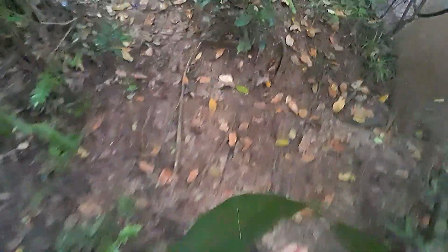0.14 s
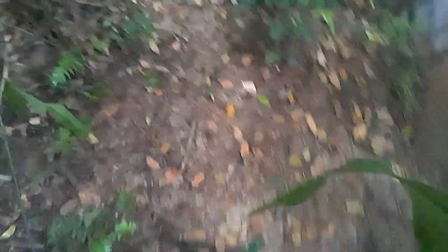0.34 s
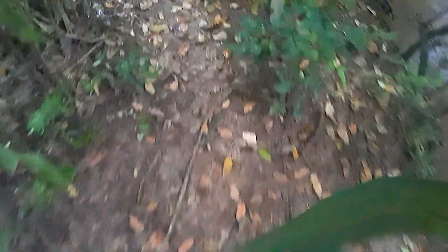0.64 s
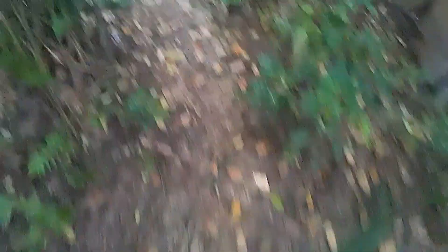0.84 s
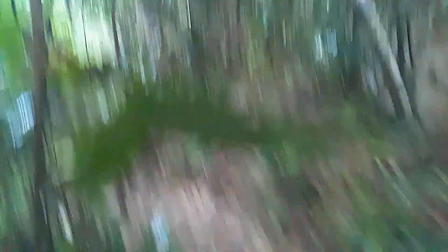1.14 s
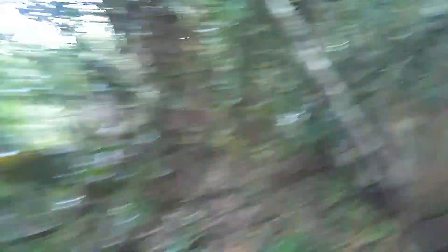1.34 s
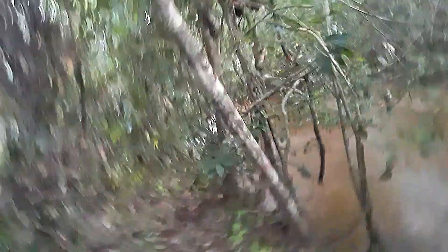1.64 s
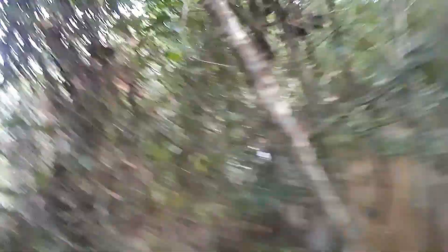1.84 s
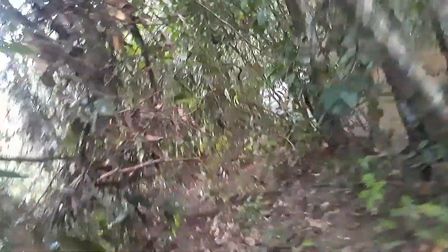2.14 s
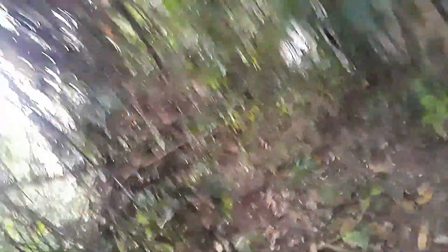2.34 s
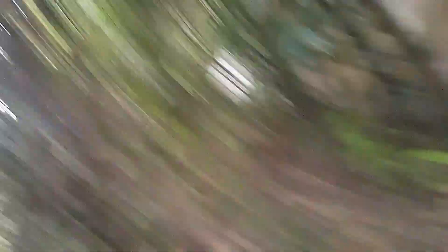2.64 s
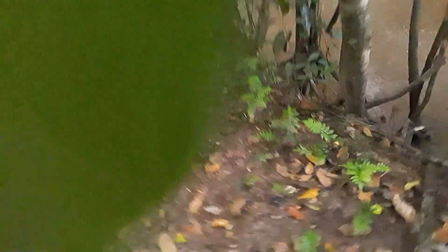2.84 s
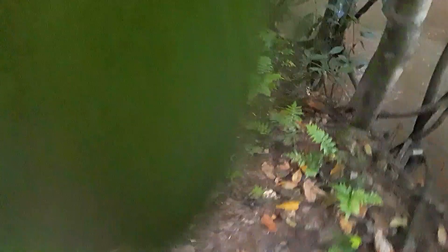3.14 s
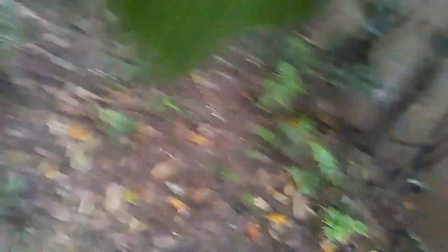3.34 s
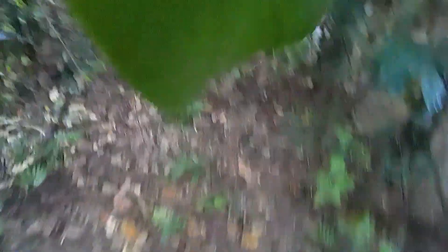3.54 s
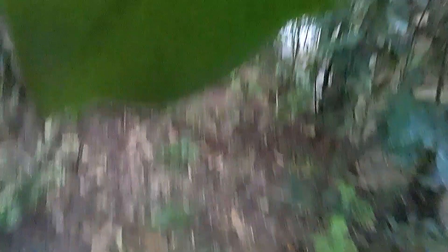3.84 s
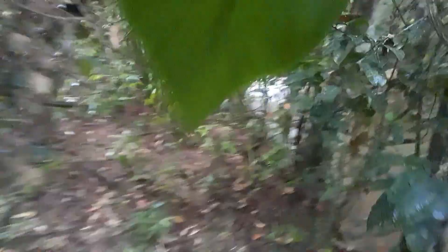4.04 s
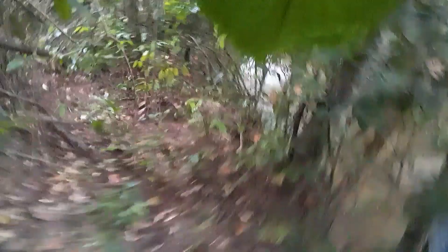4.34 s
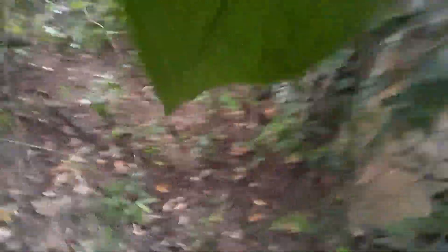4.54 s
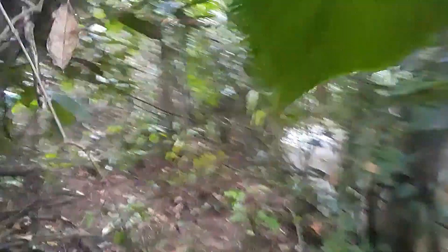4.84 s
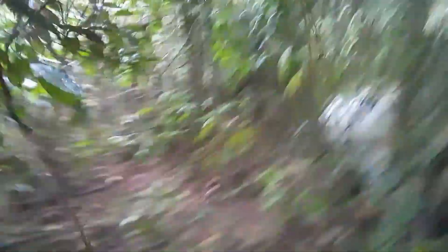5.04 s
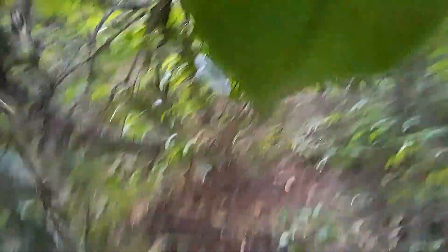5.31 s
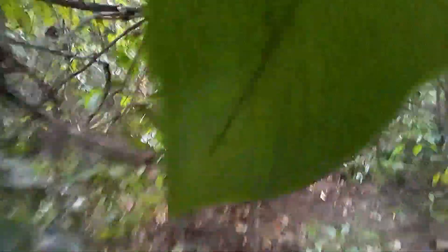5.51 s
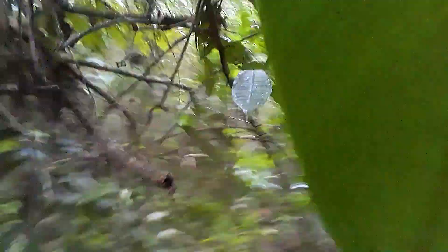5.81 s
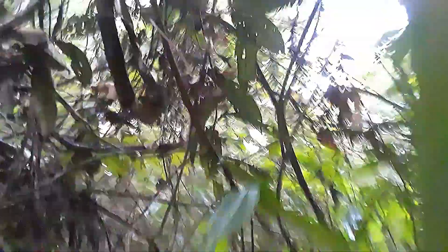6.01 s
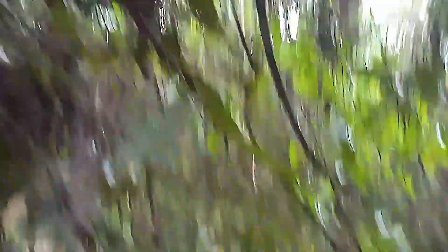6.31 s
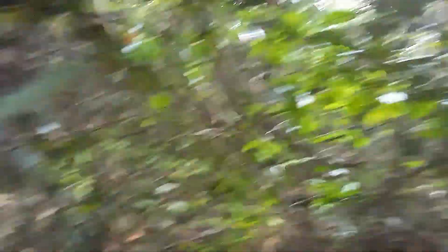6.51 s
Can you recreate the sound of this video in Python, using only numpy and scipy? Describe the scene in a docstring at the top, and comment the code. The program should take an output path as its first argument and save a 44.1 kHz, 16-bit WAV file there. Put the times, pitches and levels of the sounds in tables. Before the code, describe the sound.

Steady rain in a forest, with sharp drips and dull thumps on a big leaf held over the microphone, plus rubbing and rustling.

```python
"""Steady rain on a forest path, walking with a big leaf held close over a mono microphone.
At first, far drops wash through the canopy and patter on the litter, with the odd drip close by.
From 2 s the leaf rubs on the microphone, fat drips and bumps set it ringing, small drips tick
and wet foliage brushes past. The heaviest knock comes at 3.6 s, as the carried leaf rumbles.
Scattered knocks, rubs and rustles follow; the rumble and the rain ease towards the end."""
import sys
import numpy as np
from scipy import signal
from scipy.fft import rfft, irfft
from scipy.io import wavfile

SR = 44100
rng = np.random.default_rng(int(sys.argv[2]) if len(sys.argv) > 2 else 0)


def log_audio(samples):
    """Write samples as a 16-bit WAV file to the path given in sys.argv[1]."""
    # one column per channel
    frames = np.atleast_2d(samples).T
    # limit to full scale, then quantise
    limited = np.clip(frames, -1, 1)
    pcm = np.round(limited * 32767).astype(np.int16)
    wavfile.write(sys.argv[1], SR, pcm)


N = 294147
TIME, HZ = np.arange(N) / SR, np.arange(N // 2 + 1) * SR / N

# rain all around as the microphone turns: t/s, relative canopy level/dB, relative patter level/dB
RAIN_LEVELS = [(0.0, -35.5, -31.5), (0.15, -39, -32), (2.69, -37, -31.5), (3.16, -37, -33),
               (3.75, -34.5, -32), (3.99, -35.5, -32), (4.33, -38, -34), (4.9, -40, -34.5),
               (5.39, -37.5, -33.5), (6.67, -41, -33)]
# spectrum of the rain from the path: f/Hz, level/dB
RAIN_SPECTRUM = [(40, -38), (90, -31), (180, -7.5), (350, -2), (700, 0.5), (1200, 0), (2200, -1), (3900, 1),
                 (5200, -1), (7000, -3), (8100, -0.5), (10500, -3), (12500, 2), (15500, -0.5)]
# wet foliage passing the microphone: middle t/s, half length/s, level/dB
RUSTLE_SWELLS = [(2.62, 0.21, -37), (2.95, 0.13, -37), (3.17, .04, -36), (3.883, .11, -33.5),
                 (4.027, .035, -31), (4.174, 0.048, -28.5), (4.67, .03, -31), (5.882, 0.05, -33.5)]
# spectrum of that foliage: f/Hz, level/dB
RUSTLE_SPECTRUM = [(500, -25), (2500, -21.5), (6500, -14), (14000, -9)]
# rumble of the carried leaf: t/s, relative level/dB
SHAKE_LEVELS = [(0.0, -60), (0.35, -71), (0.91, -74), (1.49, -55), (2.04, -56), (2.21, -51), (2.36, -70),
                (2.56, -52.5), (2.9, -65), (3.05, -44.5), (3.81, -40.5), (4.68, -50.5), (5.41, -41),
                (5.66, -49.5), (6.33, -55), (6.5, -54), (6.67, -58)]
# spectrum of that rumble: f/Hz, level/dB
SHAKE_SPECTRUM = [(25, -29), (45, -14), (75, -8.5), (130, -1.5), (200, -9), (320, -15), (600, -15),
                  (1500, -67), (4000, -70)]
# the big leaf right on the microphone: start t/s, length/s, level/dB, contact cut-off f/Hz
LEAF_RUBS = [(2.008, 0.365, -39, 128), (2.929, 0.023, -26, 680), (3.111, 0.027, -29.5, 790),
             (3.435, 0.018, -34, 500), (3.568, 0.048, -23, 355), (3.847, 0.17, -40.5, 454),
             (5.388, 0.12, -35, 490), (6.31, 0.027, -36.5, 446)]
# sharp ticks close by, mostly small drips, some further cracks of knocks on the big leaf: t/s, relative
# level/dB, f/Hz, spray t60/s
CLOSE_TICKS = [ (1.063, -17, 12000, .008), (2.353, -7.5, 8500, 0.011), (2.417, -13.5, 8050, 0.011),
               (2.6572, -13.5, 3500, .008), (3.161, -11, 10100, 0.019), (3.191, -14, 6460, 0.0088),
               (3.4302, -13.5, 4060, 0.012), (3.451, -15.5, 4450, 0.011), (3.7949, -6.5, 2860, 0.018),
               (4.004, -12, 9050, .035), (4.045, -11.5, 12000, .0045), (4.107, -16, 3030, 0.032),
               (4.108, -16, 7000, .02), (4.1767, -15, 7540, 0.011), (4.179, -13, 5500, 0.025),
               (4.539, -12, 3870, .0063), (5.616, -17.5, 3000, .0053), (6.133, -13, 6000, 0.0051),
               (6.417, -13, 6000, .0044)]
# modes of the big leaf: f/Hz, level/dB
BIG_LEAF_MODES = [(82, -8), (122, -4), (148, -3), (205, 0), (305, -0.5), (365, -0.5), (445, 0.5), (560, -2),
                  (680, -2.5), (880, 4), (1120, 7), (1430, 13), (1850, 11), (2500, -14)]
# fat drips and bumps on it: t/s, level/dB over the first 20 ms, struck spot f/Hz, contact cut-off f/Hz
LEAF_KNOCKS = [ (0.044, -37, 910, 1110), (1.025, -40, 500, 605), (2.07, -34, 170, 256),
               (2.188, -33, 125, 190), (2.236, -27, 127, 247), (2.329, -34, 155, 220),
               (2.447, -37.5, 910, 920), (2.656, -30, 950, 2160), (2.846, -23.5, 358, 1000),
               (2.919, -23.5, 680, 940), (3.115, -27.5, 244, 1090), (3.210, -29.5, 191, 604),
               (3.299, -33, 185, 453), (3.432, -27.5, 383, 1380), (3.516, -26.5, 420, 1290),
               (3.5619, -14.5, 144, 740), (3.603, -17.5, 288, 417), (3.684, -27, 497, 1400),
               (3.707, -25, 168, 244), (3.795, -30.5, 700, 1520), (4.038, -30.5, 312, 700),
               (4.289, -34, 477, 553), (4.993, -24, 690, 1340), (5.161, -30.5, 610, 1090),
               (5.261, -29.5, 227, 613), (5.373, -23, 197, 920), (5.476, -29.5, 1130, 1460),
               (5.616, -34, 220, 875), (5.859, -41, 250, 400), (5.957, -40, 180, 345),
               (6.190, -26, 190, 790), (6.310, -29, 343, 700), (6.505, -38, 454, 640)]
# treble shelf of the microphone: f/Hz, level/dB
MIC_SHELF = [(8200, 1.5), (9000, -9.5)]


def from_db(db):
    """Decibels to gain."""
    return 10 ** (np.asarray(db) / 20)


def rms_one(x):
    """Scale to an rms of 1."""
    return x / np.sqrt(np.mean(x ** 2) + 1e-20)


def in_time(rows):
    """Each column of a curve at every sample."""
    s, *columns = np.transpose(rows)
    return [np.interp(TIME, s, c) for c in columns]


def coloured(x, spectrum):
    """Shape a sound by points of f/Hz, level/dB."""
    hz, db = np.transpose(spectrum)
    gain = from_db(np.interp(np.log(HZ + 1), np.log(hz), db))
    return irfft(rfft(x) * gain, N)


def cut(x, hz, kind, order=2):
    """Causal low- or high-pass."""
    return signal.sosfilt(signal.butter(order, np.clip(hz, 10, .45 * SR), kind, fs=SR, output="sos"), x)


def drift(rate_hz):
    """Slow random wander with an rms of 1."""
    return rms_one(irfft(rfft(rng.standard_normal(N)) / (1 + (HZ / rate_hz) ** 2), N))


def resonate(x, hz, width_hz):
    """One resonance with a peak gain of 1."""
    r = np.exp(-np.pi * width_hz / SR)
    w = 2 * np.pi * min(hz, .45 * SR) / SR
    return signal.lfilter(np.array([1, 0, -1]) * (1 - r * r) / 2, [1, -2 * r * np.cos(w), r * r], x + 1e-18)


def add(out, s, sound):
    """Mix a short sound in at a time."""
    at = max(round(s * SR), 0)
    out[at:at + len(sound)] += sound[:max(N - at, 0)]


def droplets(per_s, spread_db, low_hz, high_hz, width, leaves=20):
    """Random impacts of uneven size, each ringing one of many heavily damped leaves; rms 1."""
    sizes = from_db(spread_db * np.minimum(rng.exponential(1, N), 4.5)) * rng.choice([-1, 1], N)
    clicks = sizes * (rng.random(N) < per_s / SR)
    leaf = rng.integers(0, leaves, N)
    pitches = np.geomspace(low_hz, high_hz, leaves)
    return rms_one(sum(resonate(clicks * (leaf == k), hz, width * hz) for k, hz in enumerate(pitches)))


def rain(waver_db=0.5, waver_hz=12):
    """Far drops in the canopy merge into a wash; nearer ones stay separate as patter and plops."""
    canopy_db, patter_db = in_time(RAIN_LEVELS)
    wash = rng.standard_normal(N) * from_db(.5 * drift(8))
    patter = droplets(per_s=4500, spread_db=3, low_hz=1200, high_hz=13000, width=.5)
    plops = droplets(per_s=450, spread_db=4, low_hz=287, high_hz=2170, width=.17)
    drops = rms_one(coloured(wash + from_db(-6.5) * patter + from_db(-17) * plops, RAIN_SPECTRUM))
    body = coloured(drops, [(1500, -5), (3500, -25), (8000, -45)])
    bright = drops - body
    return body * from_db(canopy_db + 9.5) + bright * from_db(patter_db + 3 + waver_db * drift(waver_hz))


def near_drops(patter_db=-51, spit_db=-48):
    """Single drops land on leaves within arm's reach; the finest make only a bright spit."""
    patter = droplets(per_s=70, spread_db=1.5, low_hz=1800, high_hz=7500, width=.3)
    spits = droplets(per_s=23, spread_db=4.4, low_hz=9000, high_hz=15000, width=.4)
    return from_db(patter_db) * patter + from_db(spit_db) * spits


def rustles(crackle_db=1):
    """Wet leaves beside the path slide over each other in brief swells of hiss and crisp crackle."""
    swell = sum(from_db(db) * np.exp(-((TIME - s) / half) ** 2) for s, half, db in RUSTLE_SWELLS)
    slide = droplets(per_s=2500, spread_db=5.5, low_hz=3000, high_hz=15000, width=.7)
    crackle = droplets(per_s=160, spread_db=1.5, low_hz=4000, high_hz=15000, width=.8)
    return swell * rms_one(coloured(slide + from_db(crackle_db) * crackle, RUSTLE_SPECTRUM))


def shaking(rumble_gain_db=2, loose_db=-48, loose_follows=0.29):
    """Jolts of the leaf over the microphone merge into a lumpy rumble and shake crisp drops loose."""
    level_db, = in_time(SHAKE_LEVELS)
    jolts = droplets(per_s=230, spread_db=-2, low_hz=60.3, high_hz=700, width=.35)
    flutter = rng.standard_normal(N) * from_db(2 * drift(15))
    rumble = rms_one(coloured(jolts + from_db(6) * flutter, SHAKE_SPECTRUM))
    loose = droplets(per_s=70, spread_db=9, low_hz=3000, high_hz=14000, width=.74)
    loose_gain = from_db(loose_db + loose_follows * (level_db - level_db.max()))
    return from_db(level_db + rumble_gain_db) * rumble + loose_gain * loose


def rubs(slips_per_s=900, width=0.26, deepest_share=0.11, attack_s=0.0027, release_s=0.021):
    """The leaf sticks and slips on the microphone, ringing its modes; high ones need a hard contact."""
    out = np.zeros(N)
    slips = rng.standard_normal(N) * (rng.random(N) < slips_per_s / SR)
    leaf = sum((-1) ** k * from_db(db) * resonate(slips, hz, width * hz)
               for k, (hz, db) in enumerate(BIG_LEAF_MODES))
    for s, length, db, contact_hz in LEAF_RUBS:
        rub = cut(leaf, deepest_share * contact_hz, "high")
        rub = cut(rub, contact_hz, "low", order=4)
        press = np.clip((TIME - s) / attack_s, 0, 1)
        release = np.exp(-np.maximum(TIME - s - length, 0) / release_s)
        out += from_db(db) * press * release * rms_one(rub)
    return out


def splats(gain_db=4.5, db_per_octave=2, pitch_ratio=1.62, t60=0.02):
    """Each knock on the wet leaf ticks, louder and higher for a harder contact; rows as in CLOSE_TICKS."""
    return [(s, db + gain_db + db_per_octave * np.log2(contact_hz / 1000), pitch_ratio * contact_hz, t60)
            for s, db, _, contact_hz in LEAF_KNOCKS]


def ticks(spray_db=-6, gain_db=-5.5, crack_db=-11, samples=3000):
    """Close to the microphone, a hard impact and brief spray crack brightly and ring a small stiff leaf."""
    out, t = np.zeros(N), TIME[:samples]
    for s, level_db, hz, t60 in CLOSE_TICKS + splats():
        spray = from_db(spray_db - 60 * t / t60) * rng.standard_normal(samples)
        impact = (t == 0) + spray
        brightness = from_db(crack_db) * (hz / 3500) ** 2   # smaller targets crack brighter
        tick = resonate(impact, hz, .55 * hz) + brightness * cut(impact, 5800, "high")
        onset_rms = np.sqrt(np.mean(tick[:SR // 1000] ** 2))
        add(out, s, from_db(level_db + gain_db) * tick / onset_rms)
    return out


def thumps(smack_db=18, note_db=7, splash_db=21, scatter_db=4, damping=0.85,
           usual_db=-26.5, usual_t60=0.068, deepest_share=0.47, samples=13000):
    """Just over the microphone, a knock dents the big leaf with a smack and a splash and rings its modes."""
    out, t = np.zeros(N), TIME[:samples]
    mode_hz, mode_db = np.transpose(BIG_LEAF_MODES)
    for s, level_db, note_hz, contact_hz in LEAF_KNOCKS:
        t60 = usual_t60 * np.exp(0.0176 * (level_db - usual_db))   # heavier knocks ring longer
        strength, bend = rng.standard_normal((2, len(mode_hz)))
        hz = np.append(mode_hz * (1 + 0.077 * bend), note_hz)   # flexing shifts the modes at each knock
        gains = from_db(np.append(mode_db + scatter_db * strength, note_db))
        decay = from_db(-60 * np.outer((hz / 300) ** damping / t60, t))   # high modes die first
        rings = gains @ (decay * np.sin(2 * np.pi * np.outer(hz, t)))
        splash = cut(rng.standard_normal(samples), 1800, "low", order=1)
        splash *= from_db(splash_db - 60 * t / t60)
        smack = from_db(smack_db) * np.exp(-t / 0.00004)
        hit = cut(rings + splash + smack, deepest_share * note_hz, "high", order=3)
        hit = cut(hit, contact_hz, "low", order=4)
        onset_rms = np.sqrt(np.mean(hit[:SR // 50] ** 2))
        add(out, s, -from_db(level_db) * hit / onset_rms)
    return out


def scene():
    """One microphone under the leaf feeds both channels."""
    mono = rain() + near_drops() + thumps() + ticks() + rubs() + shaking() + rustles()
    return np.tile(mono, (2, 1))


def record(dry):
    """The microphone shelves the treble down; the top is cut steeply and peaks are held to a ceiling."""
    cutoff_hz, ceiling = 15600, .92
    top_cut = signal.ellip(12, .1, 80, cutoff_hz, fs=SR, output="sos")
    heard = signal.sosfilt(top_cut, coloured(dry, MIC_SHELF))
    return np.clip(heard, -ceiling, ceiling)


dry = scene()
out = record(dry)
log_audio(out)
```